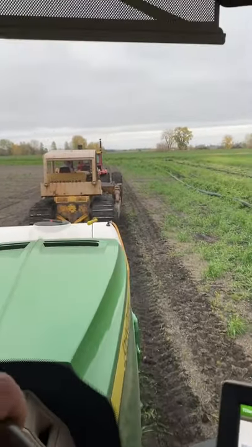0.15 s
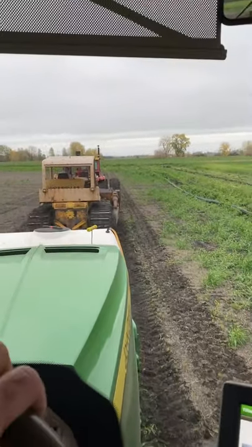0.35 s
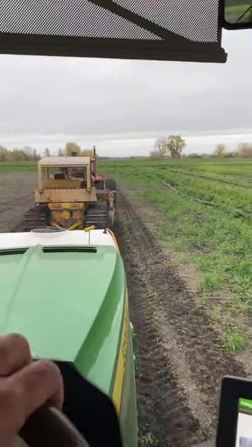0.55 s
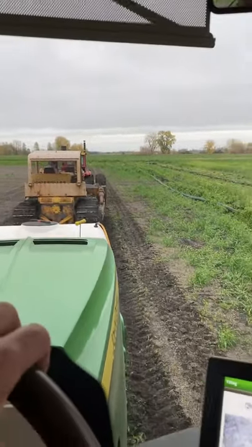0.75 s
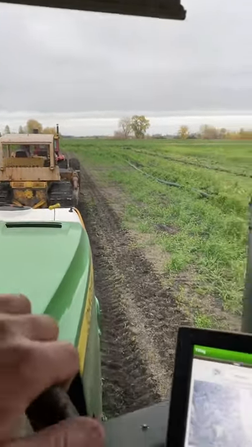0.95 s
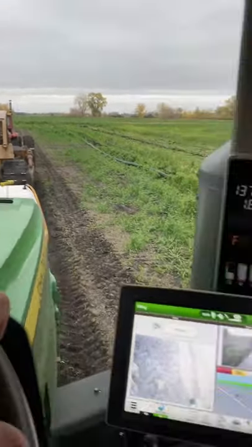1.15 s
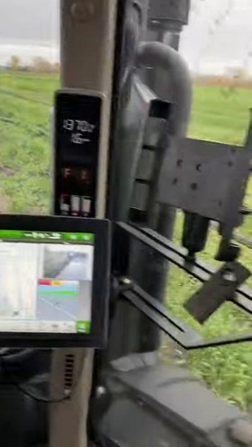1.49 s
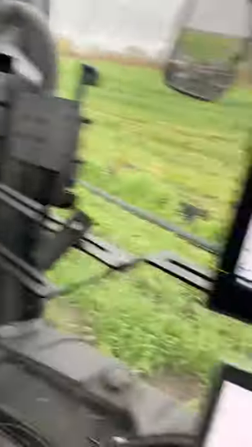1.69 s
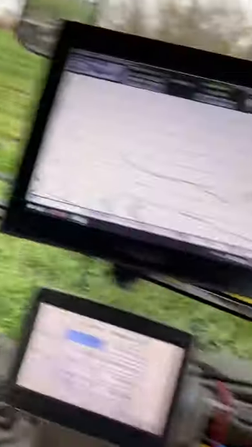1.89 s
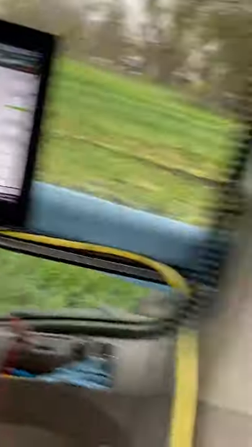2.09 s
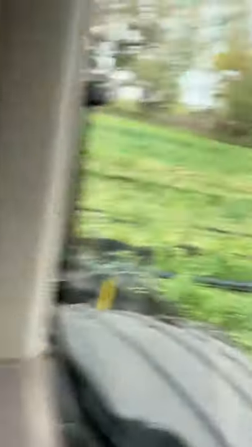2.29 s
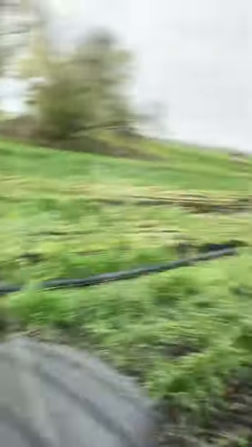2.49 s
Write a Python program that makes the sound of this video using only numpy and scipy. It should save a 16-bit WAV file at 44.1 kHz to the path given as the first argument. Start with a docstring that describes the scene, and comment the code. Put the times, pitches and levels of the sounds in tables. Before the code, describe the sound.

Steady low diesel rumble in a tractor cab, faint ticks, then boomier with soft air thumps

```python
"""Inside the cab of a six-cylinder diesel tractor at steady speed, heard by a hand-held two-port microphone.
Shaped noise makes the cab roar, which throbs and partly repeats with the firing cycle; sine waves make the
firing tones, a slower hum and fuzzy gear whines. As the hand swings toward the rear corner the bass swells
and the clatter comes and goes. Low noise bursts thud as air on the ports; bright ones tick like loose trim."""
import sys
import numpy as np
from scipy import signal
from scipy.fft import rfft, irfft
from scipy.io import wavfile
from scipy.ndimage import uniform_filter1d

SR = 44100
rng = np.random.default_rng(int(sys.argv[2]) if len(sys.argv) > 2 else 0)


def ratio(d):
    """dB to gain"""
    e = np.asarray(d, float) / 20
    return 10 ** e


def int16_out(signal):
    """Quantize to a 16-bit WAV file."""
    q = np.round(np.clip(np.atleast_2d(signal).T, -1, 1) * 32767)
    wavfile.write(sys.argv[1], SR, q.astype(np.int16))


N = 116424  # length in samples

# Hand position over time; each source takes only a share of these changes:
# time_s, bass_swell_db (near the corner), clatter_db (facing the engine), firing_swell_db, hum_swell_db
HAND_SWING = [(0, 0, 0.5, -3.5, 3.5), (.3, 2, -2.3, 0, 1), (.6, 0.5, 0, -1, 1.5), (.8, -2.5, -0.2, 0, 0.5),
              (1.1, -1, -1, 3, -1.5), (1.299, 1, 7, 0.5, -2), (1.501, 2, 6, -3, 3.5),
              (1.65, 0.5, 3.5, 4.5, 3.5), (1.72, 1, 6.5, -0.5, -1), (1.78, -0.5, -3, -1.5, 5),
              (1.899, 0, 0.4, -3.5, 11.5), (2.05, 4, 0, 3.5, 7), (2.19, 11, 2, 9.5, 7.5),
              (2.3, 6, 2.2, 6, 10), (2.5, 9, -2, 11, 6), (2.64, 12.5, 2.5, 8, 9)]
# How much of the bass swell each frequency takes, negative = the other way: frequency_hz, share
BASS_SHARE = [(30, 0.71), (70, 0.6), (110, 0.95), (180, 0.81), (280, -0.042), (500, -0.18), (1200, -0.0053),
              (2200, -0.32), (5000, -0.25)]
# How much of the clatter change each frequency takes: frequency_hz, share
CLATTER_SHARE = [(500, 0), (1200, 0.24), (2200, 0.12), (3200, 0.49), (5500, 0.57), (12000, 0.95)]

# Colour of the roar common to both ports; only its shape counts: frequency_hz, level_db (per Hz)
COMMON_ROAR = [(12, -56.5), (25, -40.5), (36, -41), (46, -22.5), (57, -16.5), (65, -12), (80, -18.5),
               (92, -10), (105, -8.5), (122, -15), (143, -7), (165, -20), (185, -21.5), (248, -8.5),
               (333, -17), (416, -16), (448, -20.5), (520, -20.5), (633, -26), (753, -24.5), (873, -25.5),
               (988, -24), (1060, -28), (1360, -26), (1620, -32.5), (1750, -26.5), (1930, -27.5),
               (2000, -24), (2150, -27), (2200, -28.5), (2370, -33), (2500, -36.5), (2780, -37),
               (3000, -38), (3930, -42), (4790, -51), (5980, -48.5), (7290, -56), (7900, -74),
               (9000, -98.5), (11500, -92.5), (12600, -67), (15000, -77.5), (16000, -81.5)]
# Colour of the roar that differs between the ports; only its shape counts: frequency_hz, level_db (per Hz)
APART_ROAR = [(12, -52.5), (30, -33), (60, -21), (100, -23), (150, -18), (230, -3), (295, -4.5), (368, -4),
              (416, -9.5), (520, -2.5), (649, -5.5), (963, -5.5), (1300, -6.5), (1620, -10), (2020, -4),
              (2500, -9.5), (3390, -18), (3930, -20.5), (4400, -21), (7290, -26)]
# Roll-off of the highest treble in the differing roar: frequency_hz, gain_db
APART_TOP = [(7000, 0), (10000, -3), (11500, -8), (13500, -14), (14800, -24), (16000, -50)]
COMMON_ROAR_DB, APART_ROAR_DB = -24.5, -33  # relative strengths of the two roars
# Likeness of the two roars: frequency_hz, in_step_share (left louder), quarter_turn_share (left earlier)
LEAN = [(60, 0.29, 0), (150, .15, -.05), (300, .65, -.1), (600, .55, -.15), (1200, 0.23, .45),
        (2200, -0.085, .5), (4000, -0.14, .6), (7000, 0, .6), (10000, 0.061, 0)]
# Throb of the roar with the firing cycle: cycle_multiple, depth_low (below 1.2 kHz), depth_high (above)
THROB = [(1, 0.07, 0.068), (2, 0.041, .08), (3, 0.023, 0.013), (6, 0.16, 0.031), (9, 0.076, 0.044)]
# Share of the roar's power that repeats every cycle: frequency_hz, share
REPEAT = [(60, 0), (200, 0.58), (450, 0.31), (1000, 0.48), (2000, 0.1), (3500, 0.4), (8000, 0.09)]
# Depth of short narrow surges in the roar: frequency_hz, depth_db
GROWL = [(110, 0), (170, 2), (450, 2), (800, 0)]
PATCHY_DB = 0.98  # depth of broader patches in the roar
RIPPLE_DB, RIPPLE_HZ, RIPPLE_S = 2.5, 40.0, 0.9  # depth, width and duration of narrow resonances
RIPPLE_FULL_HZ = 900  # the resonances thin out below this

# Faint ticks of loose trim, level before filtering: start_s, level_db
TICKS = [(.2, -50), (.33, -54), (.49, -49), (1.23, -49), (1.6, -49), (1.72, -50)]
TICK_T60_S, TICK_LOW_HZ, TICK_COMMON_DB = 0.12, 4000, -6  # time to fall 60 dB, low edge, common part

# Air puffs on the ports: start_s, level_db, rise_s, t60_s (time to fall 60 dB)
PUFFS = [(1.676, -36.5, .012, 0.33), (1.93, -53, .03, 0.55), (2.2, -50.5, 0.033, 0.55),
         (2.41, -31, 0.0087, .1), (2.445, -15.5, 0.017, 0.26), (2.559, -34.5, .015, 0.4)]
# Colour of the moving air; only its shape counts: frequency_hz, level_db (per Hz)
PUFF_COLOUR = [(25, -32), (60, -12), (105, -2), (200, -7.5), (350, -18.5), (800, -28), (1500, -48),
               (5000, -110)]

# Middle pitch of each gear whine: pitch_hz
WHINES_HZ = [990, 1331, 1372, 1453, 1540, 1778, 1992, 2020, 2110, 2154, 2582, 2862, 3150]
# Strength of each whine, in the same order: peak_level_db (before wavering), peak_s, spread_s
WHINES = [(-50, 0.73, 0.55), (-49.5, .8, 0.22), (-46, 1.39, 0.21), (-53.5, 0.46, 0.48), (-56, 1.5, 0.98),
          (-56, 1.6, 0.62), (-48.5, 1.72, .22), (-47, 1.35, .25), (-52, 0.7, 0.67), (-51, 0.6, 0.55),
          (-63, 1, 1.5), (-59.5, 2.42, .13), (-63.5, 0.64, 0.9)]
WHINE_DRIFT, WHINE_DRIFT_HZ = 0.002, 9  # rms share by which the pitch wanders, and its fastest rate
WAVER_DB, WAVER_HZ = 2, 3  # slower wavering of the whines: rms depth, fastest rate
FLUTTER_DB, FLUTTER_HZ = 2.5, 22  # quick breaking-up of the whines: rms depth, fastest rate

HUM_HZ = 49.85  # a second shaft, perhaps the fan or a pump
# Tones of the hum, level before the swell: shaft_multiple, level_db, swell_share
HUM_TONES = [(1, -39, 0.2), (2, -28.5, 0.82), (3, -38.5, 0.14)]
WOBBLE_HZ, WOBBLE_DEPTH, WOBBLE_TOP_S = 3.55, 0.55, 2.32  # the upper hum tones beat, with a peak at this time

CYCLE_HZ = 11.405  # one full firing cycle: two crank turns
# Firing tones that stand out: cycle_multiple
ORDERS = [2, 6, 8, 12, 18, 21, 27, 30, 37, 45, 51, 61, 64, 68]
# Strength of each firing tone, in the same order, level before the swell: level_db, swell_share
ORDER_LEVELS = [(-50.5, 0.19), (-29.5, 0.87), (-39, -1.3), (-36, -0.21), (-50, 1.55), (-43, 0.62),
                (-43.5, -.5), (-53, 0.55), (-46.5, -0.38), (-46.5, -0.96), (-51, -1.3), (-55.5, -0.65),
                (-53.5, 0.21), (-53, -0.62)]
TONE_WAVER_DB, TONE_WAVER_HZ = 0.7, 11  # rms depth at 70 Hz (higher tones waver more), fastest rate
TONES_APART_DB = -36  # firing tones and hum in the differing part, against the common part


def evened(x):
    """Scales a signal to an rms of 1."""
    return x / np.sqrt(np.mean(abs(x) ** 2) + 1e-20)


def read(points, hz, column=1):
    """Reads a table at any frequency, evenly along a pitch-like scale."""
    table = np.transpose(points)
    return np.interp(np.log(hz + 1), np.log(table[0] + 1), table[column])


def hand(t, column):
    """One control of the hand swing at times t."""
    table = np.transpose(HAND_SWING)
    return np.interp(t, table[0], table[column])


def slow(rate_hz):
    """Slow chance wandering of rms 1: twelve sines with random starts, none faster than rate_hz."""
    t = np.arange(0, N + 200, 100) / SR
    rates = rate_hz * np.linspace(0.1, 1, 12)
    wave = sum(np.sin(2 * np.pi * (f * t + rng.random())) for f in rates)
    return np.interp(np.arange(N) / SR, t, wave / np.sqrt(6))


def tones(base_hz, rows, column):
    """Steady multiples of one shaft, each wavering a little; one row per tone."""
    t = np.arange(N) / SR
    swell_db = hand(t, column)
    out = []
    for multiple, db, share in rows:
        waver_db = TONE_WAVER_DB * (multiple * base_hz / 70) ** 0.85 * slow(TONE_WAVER_HZ)
        level = np.sqrt(2) * ratio(db + share * swell_db + waver_db)
        out.append(level * np.sin(2 * np.pi * (round(multiple) * base_hz * t + rng.random())))
    return np.array(out)


def clatter(frames):
    """Flat spectra of a random pattern that returns each cycle and slowly turns into another."""
    length = round(SR / CYCLE_HZ)
    place = np.arange(frames * 512) % length
    turn = np.pi * np.arange(frames * 512) / SR
    one, two = rng.standard_normal((2, length))
    pattern = np.cos(turn) * one[place] + np.sin(turn) * two[place]
    z = signal.stft(pattern, nperseg=2048, noverlap=1536)[2][:, :frames]
    return evened(z) / np.sqrt(2)  # its frames add in step, so half the height of free noise


def blurred(x, bins, frames):
    """Chance values smoothed over neighbouring frequencies and times, then evened."""
    return evened(uniform_filter1d(uniform_filter1d(x, bins, axis=0), frames, axis=1))


def roar():
    """Cab noise built from random spectra, throbbing with the firing cycle; common and differing parts."""
    frames, hz = N // 512 + 6, np.fft.rfftfreq(2048, 1 / SR)
    a, b, c, d, patches, ripple, growl = rng.standard_normal((frames, 1025, 7)).T
    growl_db = read(GROWL, hz)[:, None] * blurred(growl, 4, 4)
    patches_db = PATCHY_DB * blurred(patches, 14, 8)
    ripple = blurred(ripple, max(round(RIPPLE_HZ * 2048 / SR), 1), round(RIPPLE_S * SR / 512))
    ripple_db = RIPPLE_DB * ripple * np.minimum(hz / RIPPLE_FULL_HZ, 1)[:, None]

    t = np.arange(frames) * 512 / SR
    bass_db = np.outer(read(BASS_SHARE, hz), hand(t, column=1))
    clatter_db = np.outer(read(CLATTER_SHARE, hz), hand(t, column=2))

    repeat = np.clip(read(REPEAT, hz), 0, 1)[:, None]
    common = np.sqrt(1 - repeat) * (a + 1j * b) + np.sqrt(repeat) * clatter(frames)
    in_step = np.clip(read(LEAN, hz), -0.7, 0.7)
    quarter_turn = np.clip(read(LEAN, hz, column=2), -0.7, 0.7)
    lean = in_step + 1j * quarter_turn
    # the differing part follows the common one by the lean; the rest is free noise
    apart = lean[:, None] * common + np.sqrt(1 - abs(lean) ** 2)[:, None] * (c + 1j * d)

    shapes = []
    for colour, db in ((COMMON_ROAR, COMMON_ROAR_DB), (APART_ROAR, APART_ROAR_DB)):
        curve = ratio(read(colour, hz))
        shapes.append(ratio(db) * curve / np.linalg.norm(curve))
    shapes[1] = shapes[1] * ratio(read(APART_TOP, hz))
    change_db = bass_db + clatter_db + growl_db + patches_db + ripple_db
    z = np.array([common, apart]) * np.array(shapes)[:, :, None] * ratio(change_db)

    high = 1 / (1 + (1200 / (hz + 1)) ** 4)[:, None]  # share of each frequency above the split
    out, time = np.zeros((2, N)), np.arange(N) / SR
    for column, part in ((1, 1 - high), (2, high)):
        throb = np.ones(N)
        for row in THROB:
            throb += row[column] * np.sin(2 * np.pi * (round(row[0]) * CYCLE_HZ * time + rng.random()))
        out += throb * signal.istft(z * part, nperseg=2048, noverlap=1536)[1][:, :N]
    return out * 0.82  # overall trim of the roar


def ticks():
    """Short bright noise bursts that start at once and die away; common and differing parts."""
    t = np.arange(N) / SR
    shape = sum((t > s) * ratio(db - 60 * np.maximum(t - s, 0) / TICK_T60_S) for s, db in TICKS)
    high_pass = signal.butter(2, TICK_LOW_HZ, "high", fs=SR, output="sos")
    bright = signal.sosfilt(high_pass, rng.standard_normal((2, N)))
    common = signal.sosfilt(signal.butter(8, 6500, fs=SR, output="sos"), bright[0])
    apart = signal.sosfilt(signal.butter(4, 13500, fs=SR, output="sos"), bright[1])
    return shape * np.array([ratio(TICK_COMMON_DB) * common, apart])


def puffs():
    """Air pushing on the ports: low lumpy noise that rises fast and dies away."""
    hz, t = np.fft.rfftfreq(N, 1 / SR), np.arange(N) / SR
    air = evened(irfft(rfft(rng.standard_normal(N)) * ratio(read(PUFF_COLOUR, hz)), N))
    shape = np.zeros(N)
    for start, db, rise, t60 in PUFFS:
        age = np.maximum(t - start, 0)
        fall_db = 60 * np.maximum(age - rise, 0) / t60
        shape += np.minimum(age / rise, 1) * ratio(db - fall_db)
    return air * shape


def whines():
    """Gear tones made fuzzy by wandering pitch and level; common and differing parts."""
    t, out = np.arange(N) / SR, np.zeros((2, N))
    for hz, (db, peak_s, spread_s) in zip(WHINES_HZ, WHINES):
        pitch_hz = hz * (1 + WHINE_DRIFT * slow(WHINE_DRIFT_HZ))
        turn = 2 * np.pi * (np.cumsum(pitch_hz) / SR + rng.random())
        level_db = db + WAVER_DB * slow(WAVER_HZ) + FLUTTER_DB * slow(FLUTTER_HZ)
        bump = np.exp(-0.5 * ((t - peak_s) / spread_s) ** 2)
        level = np.sqrt(2) * ratio(level_db) * bump
        out += level * np.array([np.sin(turn), 0.5 * np.cos(turn)])  # a quarter turn apart: left earlier
    return out


def hum():
    """The second shaft: a steady low tone under upper tones that swell and fade."""
    low, *upper = tones(HUM_HZ, HUM_TONES, column=4)
    t = np.arange(N) / SR
    wobble = 1 + WOBBLE_DEPTH * np.cos(2 * np.pi * WOBBLE_HZ * (t - WOBBLE_TOP_S))
    return low + sum(upper) * wobble


def firing_tones():
    """The engine's firing: sine tones at whole multiples of the firing cycle."""
    rows = [(k, *row) for k, row in zip(ORDERS, ORDER_LEVELS)]
    return tones(CYCLE_HZ, rows, column=3).sum(0)


def scene():
    """Common part on both ports, differing part added left and taken away right."""
    common, apart = roar() + ticks() + whines()
    drone = hum() + firing_tones()
    common = common + drone
    apart = apart + ratio(TONES_APART_DB) * drone + puffs()
    return np.array([common + apart, common - apart])


def roll_off(x):
    """The treble ends steeply here."""
    return signal.sosfilt(signal.butter(12, 15600, fs=SR, output="sos"), x)


def record(dry):
    """Passes on the finished two-port mix through the recorder, which roughens it band by band and ends the
    treble near 15.6 kHz."""
    return roll_off(dry)


dry = scene()
out = record(dry)
int16_out(out)
```